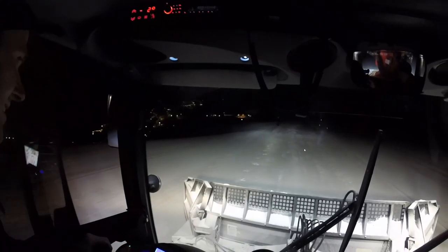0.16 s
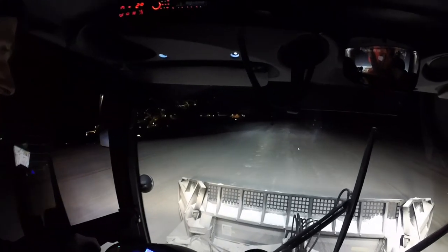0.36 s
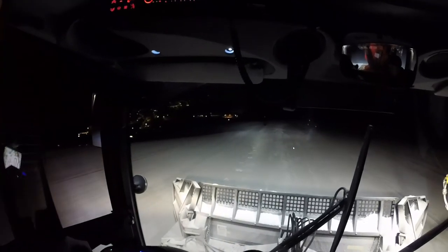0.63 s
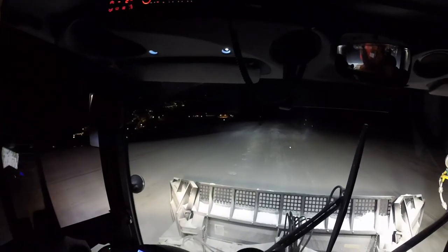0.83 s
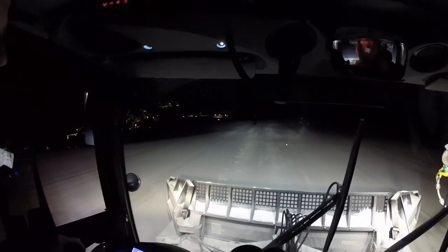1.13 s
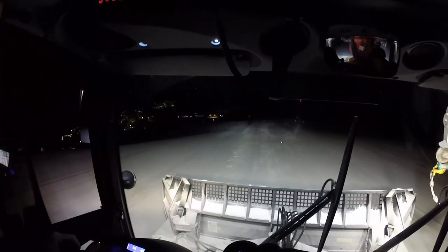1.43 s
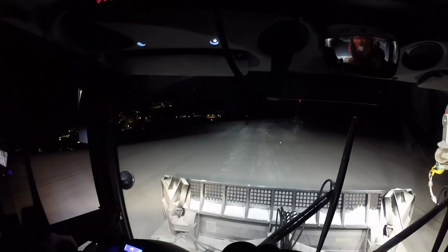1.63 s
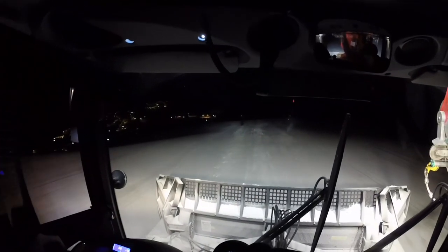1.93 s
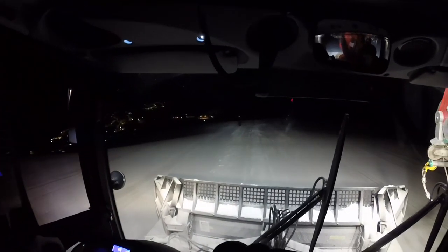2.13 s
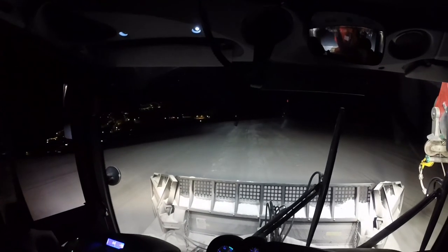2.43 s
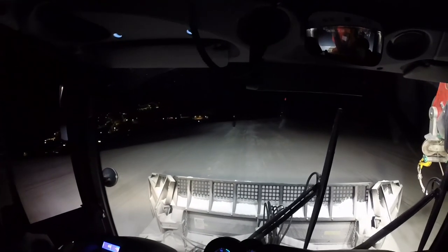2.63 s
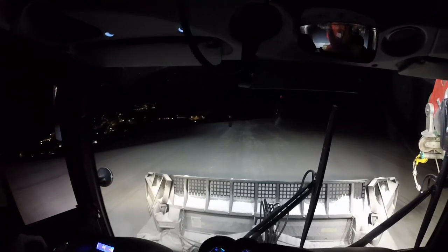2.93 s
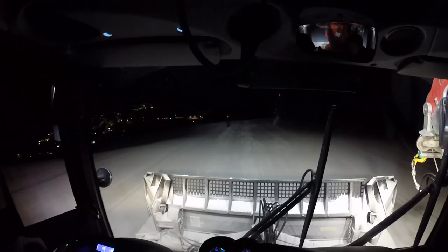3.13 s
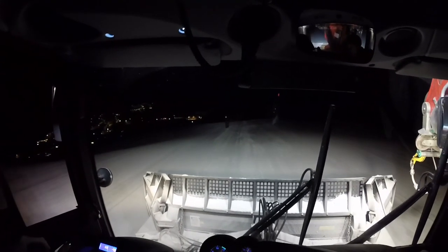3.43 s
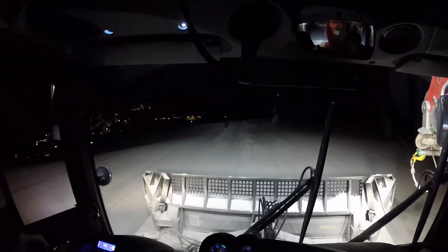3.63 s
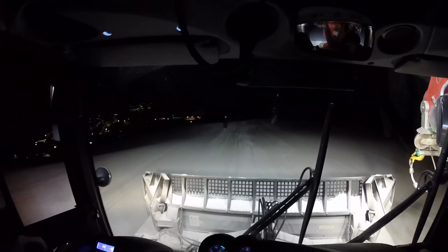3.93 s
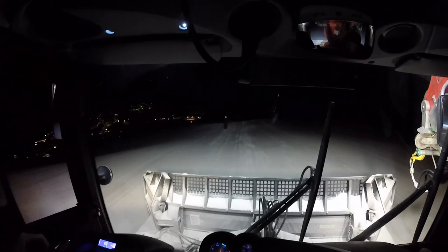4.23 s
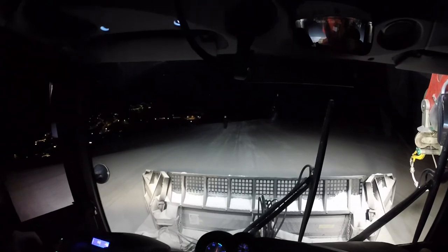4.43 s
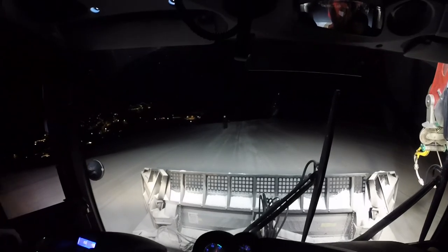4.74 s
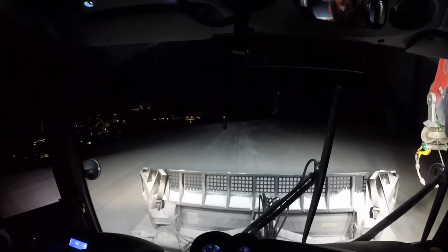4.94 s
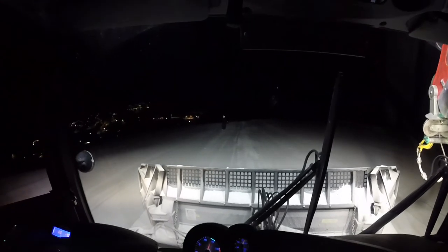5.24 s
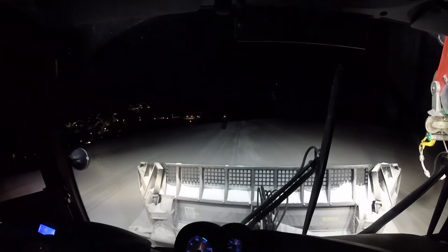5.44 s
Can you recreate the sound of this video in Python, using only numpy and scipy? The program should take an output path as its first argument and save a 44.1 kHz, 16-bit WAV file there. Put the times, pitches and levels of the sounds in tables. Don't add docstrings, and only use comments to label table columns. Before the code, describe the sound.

Inside a closed tracked snow machine cab, a heavy diesel drones deeply under steady load, with throbbing rumble, thin whines and faint rattling ticks.

```python
import sys
import numpy as np
from scipy import signal
from scipy.fft import rfft, irfft
from scipy.io import wavfile
from scipy.ndimage import uniform_filter1d

SR = 44100
rng = np.random.default_rng(int(sys.argv[2]) if len(sys.argv) > 2 else 0)


def to_wav(s):
    ch = np.atleast_2d(s).T
    pcm = np.round(np.clip(ch, -1, 1) * 32767)
    wavfile.write(sys.argv[1], SR, pcm.astype(np.int16))


def amplitude_ratio(level_db):
    exponent = np.asarray(level_db, float) / 20
    return 10 ** exponent


N = 245637

# (time [s], firing rate [Hz], firing line level [dB])
ENGINE = [(0, 67.95, -22), (.18, 67.8, -15), (.36, 67.5, -16.5), (.85, 68.18, -15), (1.05, 68.7, -17.5),
          (1.6, 68.6, -17), (1.81, 68.35, -17.5), (1.96, 69.16, -16), (2.2, 69.16, -18),
          (2.65, 69.01, -18.5), (3.3, 68.32, -17), (3.5, 68.47, -17), (4.2, 68.95, -18),
          (4.5, 68.81, -17.5), (5, 68.48, -16), (5.3, 67.83, -14.5), (5.57, 68.1, -16)]
# (time [s], load [0-1])
LOAD = [(0, 0), (.8, 0.13), (1.5, 0.24), (2.3, 0.35), (2.8, 0.43), (4, 0.59), (4.5, 0.51), (5, 0.87),
        (5.57, 0.94)]
# (multiple of firing rate [1]), (level [dB])
HIGH_ORDERS = [6, 10, 12, 14]
HIGH_ORDER_DB = [-52, -54, -50, -57]
# (time [s], mean cleat rate [Hz], shake of each [dB])
TRACKS = [(0, 23, -17), (.6, 23.33, -14), (1, 23.4, -15), (1.3, 23.48, -20.5), (1.64, 23.91, -16.5),
          (1.89, 23.99, -21.5), (2.2, 24.65, -13.5), (2.5, 24.16, -17), (2.95, 23.85, -19.5),
          (3.33, 23.58, -16), (3.45, 23.6, -18.5), (3.6, 23.84, -15.5), (3.75, 23.63, -18),
          (3.88, 23.86, -13.5), (4.2, 23.83, -14), (4.46, 23.53, -19), (4.95, 23.63, -19.5),
          (5.5, 23.45, -14.5)]
# (time [s], lead of the outer track [cleats])
TURN = [(0, -.1), (.31, .5), (.82, 1.5), (1.45, 2.5), (1.89, 3.5), (2.15, 4), (4.98, 4), (5.17, 4.3),
        (5.4, 4), (5.57, 4)]
# (time [s], length [s], lift [dB])
MESH_SURGES = [(.7, 0.68, 10), (1.77, 0.28, 12), (2.2, 0.38, 9.5), (3.3, .4, 3), (3.6, 0.17, 9),
               (4.52, 0.18, 9)]
# (time [s], length [s], lift [dB])
PRESSURE_SURGES = [(.25, 0.25, 4.5), (.78, 0.22, 13), (1.6, 0.46, 6), (2.35, 0.26, 12), (2.9, 0.44, 7.2),
                   (3.5, 0.55, 6.83), (4.6, 0.53, 7.63), (5.1, 0.59, 6.1)]
# (frequency [Hz]), (level [dB])
AUXILIARY_HZ = [11.6, 36.3, 275, 2058, 2625]
AUXILIARY_DB = [-36.5, -27.5, -48.5, -60, -73]
# (time [s], blade rate [Hz], lift [dB])
FAN = [(0, 503, -8), (.25, 506.5, 1), (.6, 510, -1), (.95, 515.5, 1), (1.3, 513, 0), (1.55, 512, 0.5),
       (1.7, 503, 7.5), (1.92, 500.4, 8.5), (2.1, 502, -1), (2.5, 500, -2), (3.5, 500, 4),
       (4.5, 495.5, 1.5), (5.57, 495, -2)]
# (frequency [Hz], half width [Hz])
VALVE_CAVITY = [(1055, 35), (2090, 90)]
# (frequency [Hz], level [dB])
CAB_COLOUR = [(9, -11), (12, 3.5), (40, -5), (80, -3), (130, -11.5), (250, -12.5), (450, -17.5),
              (750, -24.5), (1300, -31), (2300, -33), (4000, -41), (5500, -50), (9000, -58.5),
              (14500, -64.5)]
# (frequency [Hz], width [Hz], lift [dB])
PANELS = [(17.9, 7.2, 6.5), (90, 65, 1), (170.7, 23, -4.5), (296, 20, -1), (423, 70, 2), (560, 110, -3),
          (663, 49, 3.5), (745, 134, -3.5), (962, 230, 4.5), (1231, 94, 4.5), (1346, 49, 2.5),
          (1476, 350, -2.5), (1680, 28, 5.5), (2160, 400, 0), (2280, 170, 1), (2557, 66, -4),
          (3070, 170, 3.5), (3440, 260, -3.5), (3850, 270, 2.5), (4730, 190, -1.5), (5930, 450, 2),
          (7200, 630, 3), (8250, 400, -1), (9100, 900, 2.5), (10600, 600, -0.5), (15250, 500, -11)]
# (frequency [Hz], width [Hz], lift [dB])
TRIM = [(1380, 25, 3), (1680, 30, 3), (1745, 30, 3), (1870, 30, 3), (1940, 30, 3), (1990, 30, -3),
        (2250, 30, 2), (2410, 30, 3), (2510, 25, 3), (2620, 30, 4), (2925, 25, 2), (3390, 40, 4),
        (4450, 80, 2), (5000, 100, 1), (10200, 200, 2)]
# (time [s], frequency [Hz], level [dB])
DRIVE = [(0, 399.4, -42), (.6, 405, -40), (1.4, 418.3, -49), (2, 437.3, -45), (2.4, 437.8, -54),
         (2.9, 431.5, -46), (4, 429.6, -40.5), (4.6, 430.9, -45.5), (5.1, 428, -40), (5.57, 428.2, -45)]
# (time [s], frequency [Hz], level [dB])
TURBO = [(0, 6980, -69), (.5, 7150, -70), (1, 7800, -71), (1.6, 7720, -76), (5.57, 7700, -77)]
# (middle time
# [s], length [s], frequency [Hz], level [dB])
HUMS = [(0.72, 0.4, 90, -36), (1.9, 0.4, 71, -32), (3.01, 0.34, 120, -42), (0.17, 0.58, 470, -47.5),
        (0.52, 0.57, 190, -43.5), (1.73, 0.49, 395, -38.5), (1.741, 0.85, 320, -48),
        (3.734, 0.62, 387, -38), (5.2, 2, 340, -43.5), (4.25, 0.36, 350, -40), (2.29, 0.46, 530, -42.5),
        (0.88, 1.7, 580, -46.5), (5.3, 0.44, 390, -42), (1.68, 0.57, 661, -42), (4.625, 0.54, 658, -45),
        (1.69, 0.38, 252, -43), (5.26, 0.75, 730, -48), (1.4, 0.79, 835, -53), (3.2, 1.4, 990, -60),
        (5.25, 0.85, 650, -48.5), (0.53, 1.2, 800, -51), (4.213, 1, 925, -55), (2.2, 1.8, 1300, -50.5),
        (4.24, 1.4, 1235, -51), (2.06, 0.64, 1345, -53), (2.828, 0.34, 1345, -51.5),
        (3.28, 0.57, 1385, -53), (4.94, 1.1, 1380, -53), (0.1, 0.36, 1600, -55), (3.95, 0.57, 1740, -54),
        (0.69, .6, 2100, -52), (0.59, 0.73, 3400, -57), (0.55, 1, 2800, -58), (4.4, 1, 3400, -65),
        (3.5, 2.4, 3393, -57.5), (0.092, 0.31, 3880, -55), (3.2, 0.56, 1900, -55), (2.15, 0.53, 3400, -55),
        (0.56, .6, 9200, -74), (2.3, 0.78, 9150, -74)]
# (middle time [s], length
# [s], frequency [Hz], level [dB])
MORE_HUMS = [(0.56, 1, 46, -28.5), (3.5, .5, 47, -37), (5.3, 0.66, 25, -30), (3.7, 1.3, 86, -37),
             (2.87, 0.32, 88, -34), (2.67, 0.63, 157, -38), (3.6, 1, 156, -42.5), (5.28, 0.84, 154, -39.5),
             (5.2, 1.1, 295, -41), (4.72, 0.37, 140, -36), (2.2, .3, 145, -36), (0.34, .6, 654, -47),
             (5.35, .5, 1045, -54), (5.35, .5, 1056.5, -48), (5.35, 0.46, 1068, -52),
             (5.35, .5, 1079, -52)]
# (time [s], peak level [dB], decay [s])
TICKS = [(1.326, -44, .004), (1.503, -47, .004), (1.65, -36, 0.011), (2.2, -41, 0.0056), (2.492, -42, .004),
         (2.679, -43, .005), (3.063, -48, .004), (3.578, -45, .004), (3.748, -44, .004), (3.994, -45, .004),
         (4.12, -45, 0.0036), (5.23, -45, .004), (5.255, -41, .004), (5.457, -42, .006)]

MEAN_FIRING_HZ = 68.7
GEAR_RATIO, PUMP_RATIO, WHINE_RATIO = 11 / 3, 4.81, 14.5
SECOND_DB, THIRD_DB, FAN_DB, VALVE_DB = (-41, -32), (-36.5, -30), (-39.5, -57), (-61.5, -43.5)
GEAR_DB, PUMP_DB = [(-44, -46.5), (-57, -61)], [(-52, -37), (-48, -48.5)]
FAR_TRACK_DB = -3.5
CLEAT_SECOND_DB = -23
STEER_HZ, STEER_DB, STEER_ENDS_S = 290, -37.5, 0.93
WHINE_DB, WHINE_JOINS_S = -46, 3.05
ROAR_LIFT_DB = (0.46, 0.22, 0.3, 3.2)
ROAR_WANDER_DB = (.6, 0.25, 0.3, .5)
GRAIN_DB = 1.0


def columns(table):
    s, *cols = np.transpose(table)
    return [np.interp(np.arange(N) / SR, s, c) for c in cols]


def walk(rate):
    k = int(SR / rate)
    held = np.repeat(rng.standard_normal(N // k + 1), k)
    return 1.46 * uniform_filter1d(uniform_filter1d(held, k), k)[:N]


def turns(hz):
    return 2 * np.pi * (np.cumsum(hz) / SR + rng.random())


def tone(phase, db, sway_db, sway_rad):
    return np.sqrt(2) * amplitude_ratio(db + sway_db * walk(9)) * np.sin(phase + sway_rad * walk(7))


def orders(phase, levels, sway_db, sway_rad):
    return sum(tone((k + 1) * phase + k, db, sway_db, sway_rad * (k + 1)) for k, db in enumerate(levels))


def loaded(db):
    return db[0] + (db[1] - db[0]) * columns(LOAD)[0]


def surges(rows):
    t = np.arange(N) / SR
    return sum(db * np.exp(-(2 * (t - s) / length) ** 2) for s, length, db in rows)


def engine(firing_hz, firing_db):
    low = orders(turns(firing_hz), [firing_db, loaded(SECOND_DB), loaded(THIRD_DB)], 0.21, 0.03)
    high = sum(tone(turns(k * firing_hz), db, 1.4, 0.16) for k, db in zip(HIGH_ORDERS, HIGH_ORDER_DB))
    return low + high


def tracks():
    cleat_hz, shake_db = columns(TRACKS)
    phase, apart = turns(cleat_hz), np.pi * columns(TURN)[0]
    sharp = tone(2 * (phase + apart), shake_db + CLEAT_SECOND_DB, 1.5, 0.22)
    near = tone(phase + apart, shake_db, 0.24, 0.039)
    far = tone(phase - apart, shake_db + FAR_TRACK_DB, 0.29, 0.047)
    return sharp + near + far


def gear(firing_hz):
    mesh_db = surges(MESH_SURGES)
    return orders(turns(GEAR_RATIO * firing_hz), [loaded(db) + mesh_db for db in GEAR_DB], 3.1, 0.15)


def pump(firing_hz):
    pressure_db = surges(PRESSURE_SURGES)
    levels = [loaded(db) + share * pressure_db for db, share in zip(PUMP_DB, (1, .3))]
    return orders(turns(PUMP_RATIO * firing_hz), levels, 0.7, 0.2)


def steering():
    fade = 1 / (1 + np.exp((np.arange(N) / SR - STEER_ENDS_S) / 0.038))
    return fade * tone(turns(np.full(N, STEER_HZ)), STEER_DB, 0.81, 0.18)


def auxiliaries(firing_hz):
    speed = firing_hz / MEAN_FIRING_HZ
    return sum(tone(turns(hz * speed), db + 2.6 * walk(1.5), 1.4, 0.86)
               for hz, db in zip(AUXILIARY_HZ, AUXILIARY_DB))


def cooling_fan():
    fan_hz, lift_db = columns(FAN)
    return tone(turns(fan_hz), loaded(FAN_DB) + lift_db, 0.62, 0.26)


def valve():
    oil = rng.standard_normal(N)
    ringing = 0
    for hz, half_width in VALVE_CAVITY:
        cavity = signal.butter(1, [hz - half_width, hz + half_width], "band", fs=SR, output="sos")
        ringing = ringing + signal.sosfilt(cavity, signal.sosfilt(cavity, oil))
    return amplitude_ratio(loaded(VALVE_DB)) * ringing / ringing.std()


def cab_response_db(hz):
    colour_hz, level_db = np.transpose(CAB_COLOUR)
    colour_db = np.interp(np.log(hz), np.log(colour_hz), level_db, left=-90)
    colour_db = colour_db + sum(db / (1 + (2 * (hz - f) / w) ** 2) for f, w, db in PANELS + TRIM)
    modes = np.interp(np.log(hz) * 120, np.arange(1400), rng.standard_normal(1400))
    return colour_db + GRAIN_DB * modes * np.clip(hz / 1500 - .5, 0, 1)


def roar(firing_hz):
    hz = np.maximum(np.fft.rfftfreq(N, 1 / SR), 1)
    spectrum = rfft(rng.standard_normal(N)) * amplitude_ratio(cab_response_db(hz))
    knock = np.cos(turns(firing_hz))
    octave = np.log2(hz / 8)
    load = columns(LOAD)[0]
    curves = [lift * load ** 3 + db * walk(7) for lift, db in zip(ROAR_LIFT_DB, ROAR_WANDER_DB)]
    out = 0
    for centre in np.arange(0, 11.6, .5):
        window = np.cos(np.pi * np.clip(octave - centre, -.5, .5)) ** 2
        band = irfft(spectrum * window, N)
        place = np.interp(centre, [3.6, 5.9, 7.9, 10], [0, 1, 2, 3])
        share = np.maximum(1 - abs(place - np.arange(4)), 0)
        swell_db = sum(w * c for w, c in zip(share, curves))
        depth = np.interp(centre, [5, 7, 9, 11], [.05, .14, .03, 0])
        out = out + band * amplitude_ratio(swell_db + 0.43 * walk(12)) * (1 + depth * knock)
    return out * amplitude_ratio(-21.5) / out.std()


def drive_motor():
    drive_hz, drive_db = columns(DRIVE)
    return tone(turns(drive_hz), drive_db, 2.7, 0.28)


def turbocharger():
    turbo_hz, turbo_db = columns(TURBO)
    return tone(turns(turbo_hz * (1 + .02 * walk(900))), turbo_db, 1.7, .4)


def hums():
    t = np.arange(N) / SR
    out = 0
    for middle, length, hz, db in HUMS + MORE_HUMS:
        swell = np.exp(-(2 * (t - middle) / length) ** 4)
        phase = turns(np.full(N, hz)) + hz / 900 * walk(60)
        out = out + swell * tone(phase, db, 1.45, 0.36)
    return out


def ticks():
    out, t = np.zeros(N), np.arange(2000) / SR
    burst = signal.butter(2, [2500, 9800], "band", fs=SR, output="sos")
    for s, db, decay in TICKS:
        i = int(s * SR)
        shape = (1 - np.exp(-t / .0015)) * np.exp(-t / decay)
        tick = amplitude_ratio(db) * shape * signal.sosfilt(burst, rng.standard_normal(len(t)))
        out[i:i + len(t)] += tick[:N - i]
    return out


def injection_whine(firing_hz):
    fade = 1 / (1 + np.exp((WHINE_JOINS_S - np.arange(N) / SR) / 0.18))
    return fade * tone(turns(WHINE_RATIO * firing_hz), WHINE_DB, .7, 0.1)


def scene():
    firing_hz, firing_db = columns(ENGINE)
    machine = engine(firing_hz, firing_db) + tracks() + gear(firing_hz) + pump(firing_hz) + steering()
    machine = machine + auxiliaries(firing_hz) + cooling_fan() + valve() + drive_motor() + turbocharger()
    cab = roar(firing_hz) + hums() + ticks()
    return (machine + cab + injection_whine(firing_hz))[None]


def low_pass(x):
    return signal.sosfilt(signal.butter(12, 15290, fs=SR, output="sos"), x)


def record(dry):
    rounded = 1.04 * dry - .12 * np.clip(dry, -1.2, 1.2) ** 3
    return low_pass(rounded)


dry = scene()
out = record(dry)
to_wav(out)
```